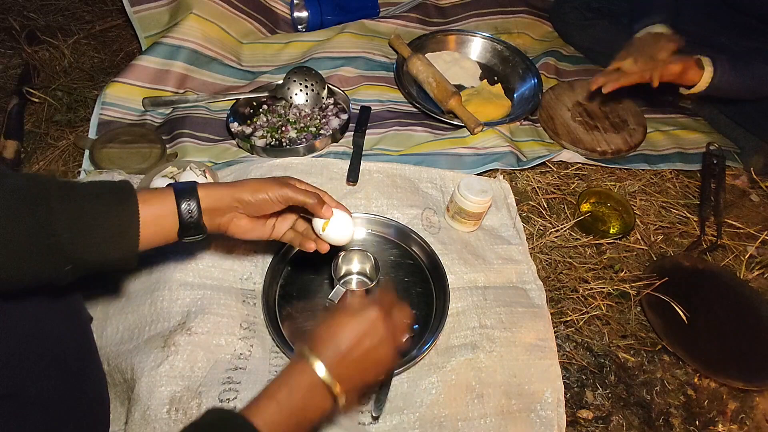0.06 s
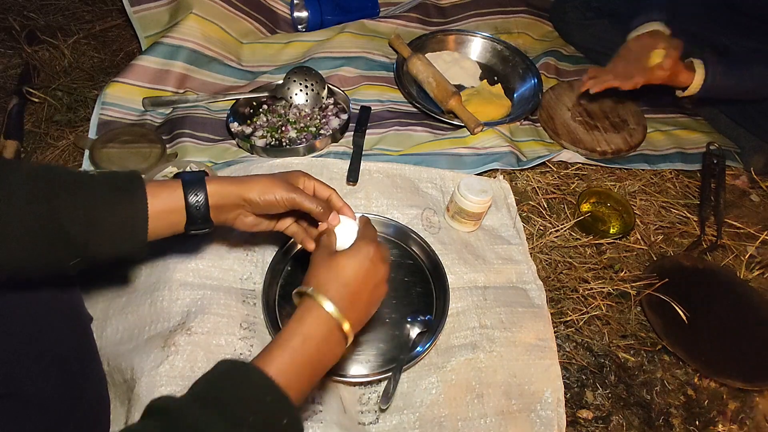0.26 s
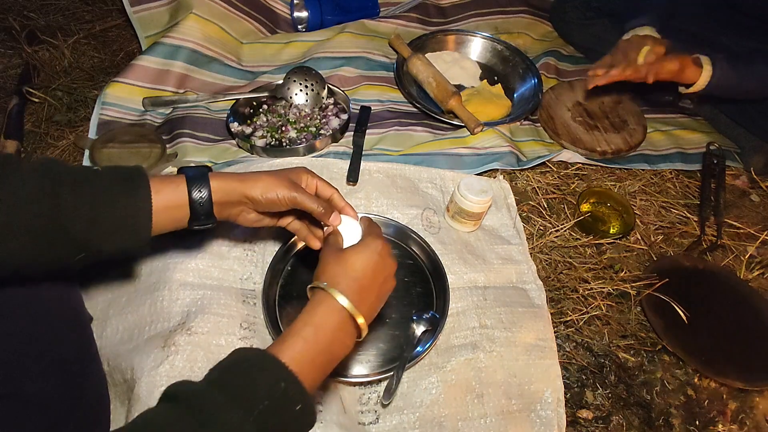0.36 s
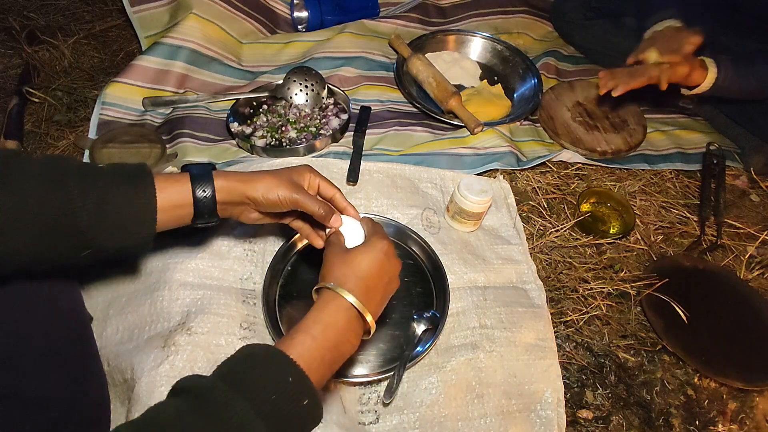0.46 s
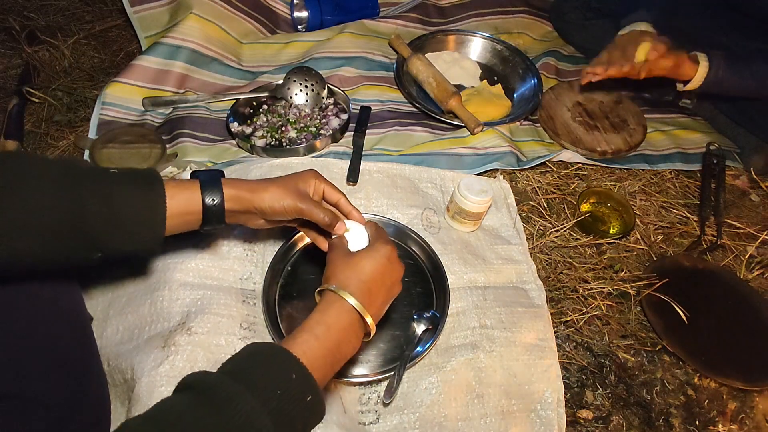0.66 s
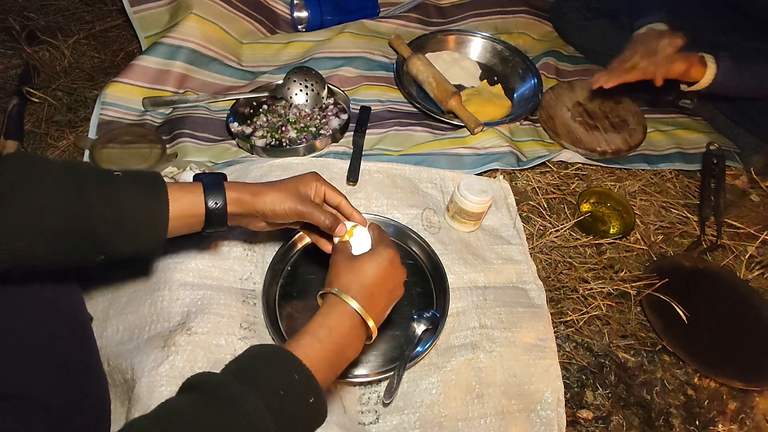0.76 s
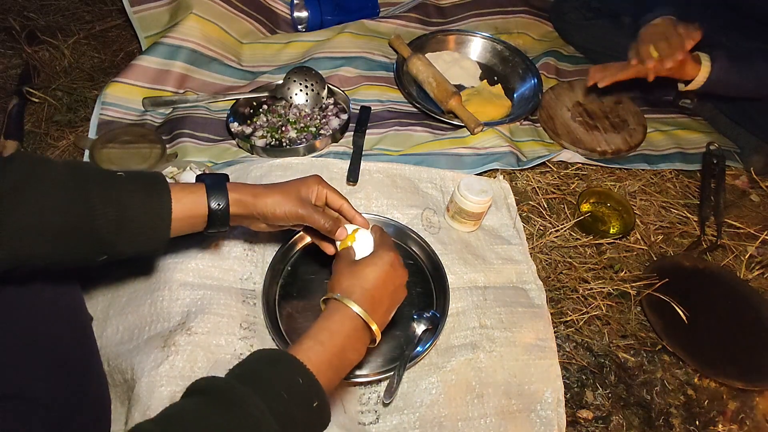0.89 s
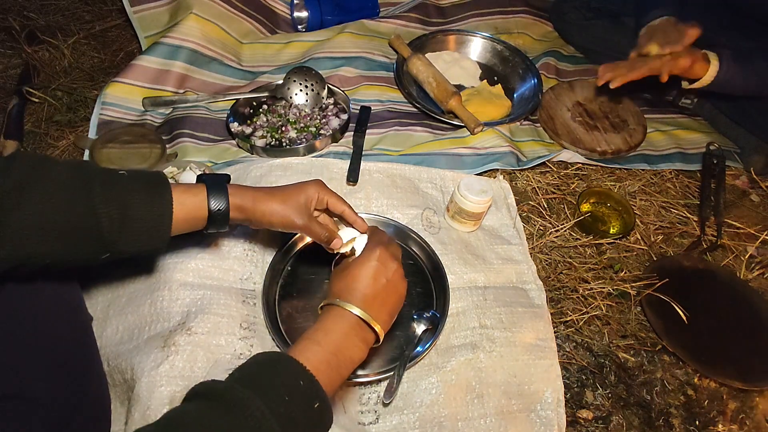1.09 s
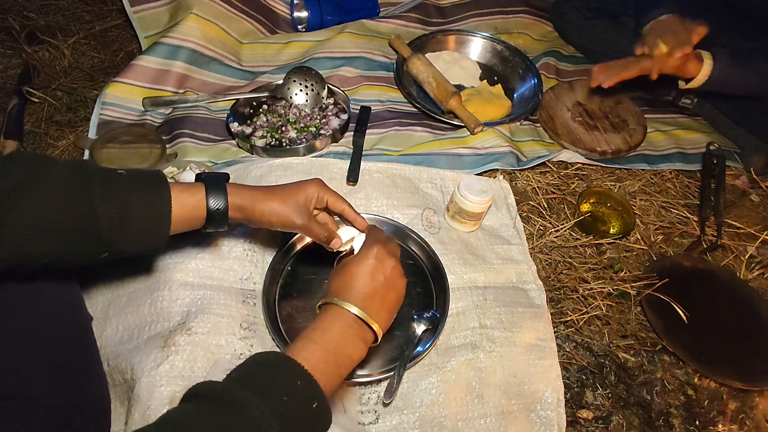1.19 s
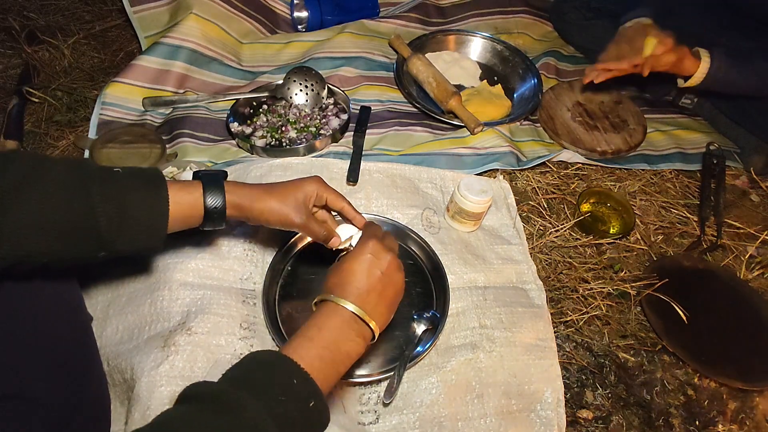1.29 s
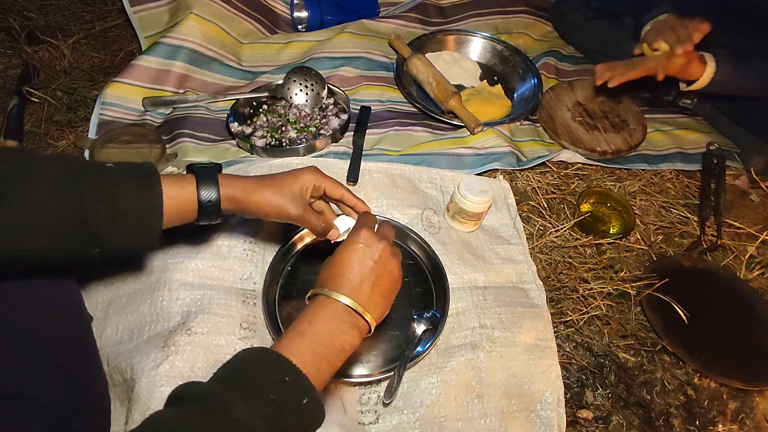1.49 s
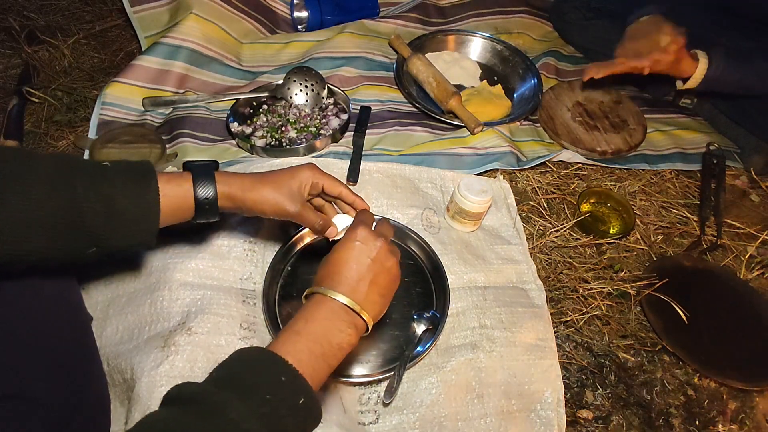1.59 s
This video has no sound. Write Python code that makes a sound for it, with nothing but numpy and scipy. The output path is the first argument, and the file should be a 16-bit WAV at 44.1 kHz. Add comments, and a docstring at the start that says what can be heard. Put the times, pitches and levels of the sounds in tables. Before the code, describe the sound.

Hard-boiled egg shell being cracked and peeled over a steel plate, with knocks, scrapes and small ticks

```python
"""Outdoors, close to a phone, over a faint hiss and whine that lie under it all: something hard knocks and
scrapes a steel plate in four bursts, as low plate modes and dull thuds under gritty noise and thin ringing clinks.
Then fingers rub the egg shell, as soft strokes of resonant noise and hiss, while a few flakes tick off,
each a crack with short rings. Near the end one piece snaps: a hollow tone with noise that swells and dies fast."""
import sys
import numpy as np
from scipy import signal
from scipy.fft import rfft, irfft
from scipy.io import wavfile
from scipy.ndimage import uniform_filter1d

SR = 44100
rng = np.random.default_rng(int(sys.argv[2]) if len(sys.argv) > 2 else 0)


def digitize_waveform(pressure):
    """Quantize a signal to 16-bit integers and store it at the path in sys.argv[1].

    Rows of a 2-D input are taken as channels; values are limited to [-1, 1].
    """
    field = np.atleast_2d(pressure).T
    bounded = np.clip(field, -1, 1)
    quanta = np.round(bounded * 32767).astype(np.int16)
    wavfile.write(sys.argv[1], SR, quanta)


N = 72765
T = np.arange(N) / SR
LIGHT_FROM_S = 0.3  # from here on the scrape is light

# Contact on the plate, relative levels: (time [s], push on the body below 600 Hz [dB], 600-900 Hz [dB],
# above 900 Hz [dB], grit in the middle [dB], grit in the treble [dB])
CONTACT = [(0.02, -61, -73.5, -74, -77.5, -87), (0.034, -39.5, -37, -55, -70.5, -66),
           (0.044, -24, -20.5, -39, -67.5, -68.5), (0.05, -25.5, -13, -14, -39.5, -38.5),
           (0.056, -18.5, -19.5, -23, -29.5, -35.5), (0.084, -20, -28, -25.5, -29.5, -32.5),
           (0.124, -40.5, -52.5, -46.5, -44.5, -55.5), (0.154, -55.5, -54, -42, -48.5, -49.5),
           (0.168, -24, -33, -35, -56, -57.5), (0.178, -17.5, -31.5, -30, -29, -21.5),
           (0.188, -18.5, -30.5, -33, -20.5, -27), (0.2, -18.5, -25, -33, -31.5, -23.5),
           (0.214, -17, -26.5, -16, -20.5, -27), (0.23, -13.5, -25.5, -22.5, -27, -29.5),
           (0.258, -20.5, -22.5, -19, -29, -27), (0.27, -27.5, -26.5, -32, -27.5, -28.5),
           (0.29, -18, -25.5, -23, -25.5, -27), (0.316, -29.5, -33.5, -29, -37, -31),
           (0.33, -27, -43.5, -35.5, -30.5, -39), (0.378, -61, -52, -49.5, -58, -53.5),
           (0.394, -40, -48, -51, -41, -53), (0.418, -33, -32.5, -44, -40.5, -44),
           (0.506, -34.5, -43.5, -38.5, -42.5, -44), (0.536, -43, -51.5, -44.5, -52, -54.5),
           (0.564, -57.5, -56, -43.5, -53.5, -54), (0.582, -35.5, -35.5, -29.5, -49, -37.5),
           (0.602, -34, -40.5, -30.5, -33, -37.5), (0.634, -35, -54, -39, -44, -37),
           (0.72, -105, -86, -87, -74, -97)]


def undb(db):
    """Decibels to amplitude factor."""
    return 10 ** (np.asarray(db) / 20)


def unit(x):
    """Scale to an RMS of one."""
    return x / np.sqrt(np.mean(x ** 2))


def curve(table, axis):
    """Amplitude over time, drawn in dB between the rows of one table column; silent outside them."""
    table = np.array(table)
    return undb(np.interp(T, table[:, 0], table[:, axis], left=-120, right=-120))


def band(x, lo_hz, hi_hz):
    """Gentle band-pass."""
    return signal.sosfilt(signal.butter(2, [lo_hz, hi_hz], "band", fs=SR, output="sos"), x)


def above(x, hz):
    """The part of x above hz; x minus it is the part below."""
    return signal.sosfiltfilt(signal.butter(2, hz, "high", fs=SR, output="sos"), x)


def colour(x, points):
    """Shape the spectrum by (frequency [Hz], level [dB]) points."""
    p = np.array(points)
    hz = np.arange(N // 2 + 1) * SR / N + 1  # the 1 avoids log(0)
    gain_db = np.interp(np.log(hz), np.log(p[:, 0]), p[:, 1])
    return irfft(rfft(x) * undb(gain_db), N)


def ring(x, modes):
    """Sum of resonances (frequency [Hz], width [Hz], level [dB]), with alternate signs."""
    out = 0
    for k, (hz, width_hz, db) in enumerate(modes):
        b, a = signal.iirpeak(hz, hz / max(width_hz, 5), SR)
        out = out + (-1) ** k * undb(db) * signal.lfilter(b, a, x)
    return out


def grains(rough_db):
    """Dense noise with scattered larger grains."""
    lift = uniform_filter1d(rng.exponential(size=N), size=4)
    return unit(rng.standard_normal(N) * undb(rough_db * lift))


def spikes(events):
    """Single-sample impulses at (time [s], level [dB])."""
    x = np.zeros(N)
    for s, db in events:
        x[int(s * SR)] += undb(db)
    return x


def swell(s, rise_s, t60_s):
    """Exponential rise to s, then decay."""
    return np.exp(np.minimum((T - s) / rise_s, -np.log(1000) * (T - s) / t60_s))


def bump(s, half_s):
    """Smooth swell and fade around s."""
    return np.exp(-((T - s) / half_s) ** 2)


def air():
    """Faint steady hiss of coloured noise with a thin whine of steady sines."""
    # Colour of the hiss: (frequency [Hz], relative level per hertz [dB])
    hiss_colour = [(30, -21), (100, -6), (200, 3), (500, -3.5), (800, -4.5), (1100, -9.5), (2000, -10),
                   (4000, -18), (6500, -22), (9000, -21.5), (16000, -24)]
    # Whine: (frequency [Hz], RMS level [dB])
    whine_tones = [(800, -75.5), (1600, -83), (2400, -86.5)]
    hiss = unit(colour(rng.standard_normal(N), hiss_colour)) * undb(-67)
    whine = sum(undb(db) * np.sqrt(2) * np.sin(2 * np.pi * hz * T) for hz, db in whine_tones)
    return hiss + whine


def fingers():
    """Each stroke of the fingers rustles in the shell's resonances with a hiss above."""
    # Resonances of the shell under the fingers: (frequency [Hz], width [Hz])
    shell_resonances = [(1100, 270), (1850, 223), (3550, 740), (5400, 490)]
    # Strokes: (middle [s], half length [s], level in each of four shell resonances [dB] x 4,
    # hiss level [dB], hiss centre [Hz])
    strokes = [(0.809, 0.034, -83.5, -85, -60, -67.5, -72, 6420),
               (0.869, 0.033, -85, -86, -83, -75, -70, 9000),
               (0.967, 0.043, -62.5, -65.5, -58.5, -59, -57.5, 8800),
               (1.131, 0.032, -85, -72, -74, -69.5, -88, 9000),
               (1.181, 0.029, -79, -83, -83, -84, -61.5, 10500),
               (1.26, 0.032, -81, -82, -85, -87, -61.5, 9700),
               (1.498, 0.031, -78.5, -82, -81.5, -75.5, -60.5, 10600),
               (1.6, .03, -84.5, -91, -85, -88, -67, 8800)]
    rustles = [unit(band(grains(2.2), hz - w / 2, hz + w / 2)) for hz, w in shell_resonances]
    out = 0
    for s, half_s, *rustle_db, hiss_db, hiss_hz in strokes:
        hiss = unit(band(grains(2.2), hiss_hz * 0.69, hiss_hz * 1.26))
        rustle = sum(undb(db) * x for db, x in zip(rustle_db, rustles))
        out = out + bump(s, half_s) * (rustle + undb(hiss_db) * hiss)
    return out


def flakes():
    """Each flake ticks off with a sharp crack, three short rings and a little crumble after it."""
    # Ticks: (time [s], ring t60 [s], then three rings as frequency [Hz] and level [dB],
    # crack peak level [dB], crack top [Hz], relative crumble level [dB])
    ticks = [(.959, 0.017, 3710, -43, 5400, -53, 8900, -45, -35, 12000, -71),
             (1.134, 0.04, 2488, -37, 1600, -41, 3710, -48.5, -48, 4970, -55.5),
             (1.208, .03, 2430, -56.5, 1600, -66, 3700, -70, -66, 4000, -85),
             (1.265, 0.015, 1113, -31.5, 2300, -30, 3450, -49, -32, 3500, -49.5)]
    out = 0
    for s, t60, *modes, crack_db, top_hz, crumble_db in ticks:
        rings = 0
        for hz, db in zip(modes[::2], modes[1::2]):
            ring_t60 = t60 * min(1, (modes[0] / hz) ** 2)  # rings above the first die sooner
            fade = swell(s + t60 / 20, t60 / 40, ring_t60)
            rings = rings + undb(db) * np.sin(2 * np.pi * hz * (T - s)) * fade
        crack = band(spikes([(s, 0), (s + 0.00063, -7)]), top_hz / 4, top_hz)
        crack = band(crack, top_hz / 8, top_hz * 1.64)
        crumble = unit(band(grains(2.78), 600, 3000)) * swell(s + 0.018, 0.015, 0.094)
        out = out + rings + undb(crack_db) * crack / crack.max() + undb(crumble_db) * crumble
    return out


def snap():
    """A larger piece breaks away: faint crumbs, a hiss, a hollow swelling tone, then the plate answers late."""
    # Rings of the piece: (frequency [Hz], width [Hz], relative level [dB])
    piece_rings = [(2848, 44, -6.5), (3030, 34, -3), (3285, 48, -7.5), (3560, 23, -14), (4430, 29, -28)]
    # Colour of the hiss: (frequency [Hz], relative level per hertz [dB])
    hiss_colour = [(1200, -41.5), (2000, -2.5), (2500, 5), (4000, -7), (5900, 2.5), (7300, -9),
                   (9500, -2.5), (16000, -16)]
    # Late answer of the plate: (frequency [Hz], width [Hz], relative level [dB])
    late_modes = [(395, 34, -2), (556, 45, -2.5), (1170, 81, -8)]
    snap_s, rise_s, t60_s = 1.381, 0.007, 0.022
    crumbs_s, crumbs_half_s, low_crumbs_hz = 1.3, 0.033, 2580

    shape = np.where(T < snap_s, bump(snap_s, rise_s), swell(snap_s, rise_s, t60_s))
    noisy = unit(ring(grains(1.9), piece_rings))
    tone = shape * (np.sin(2 * np.pi * piece_rings[0][0] * T) + 0.29 * noisy)
    after_ring = undb(-16.5) * swell(snap_s + 0.012, 0.0043, 0.08) * noisy

    # two overlapping puffs of crumbs, the second lower
    crumbs = unit(band(grains(1.36), 2700, 3350)) * bump(crumbs_s - 0.008, crumbs_half_s)
    low_crumbs = unit(band(grains(2.6), low_crumbs_hz * 0.83, low_crumbs_hz * 1.22))
    crumbs = crumbs + 0.84 * low_crumbs * bump(crumbs_s + 0.0098, crumbs_half_s)

    hiss = unit(colour(grains(2.0), hiss_colour)) * swell(1.369, 0.00096, t60_s=0.13)
    late = unit(band(ring(grains(2.4), late_modes), 290, 1200)) * swell(1.395, 0.015, t60_s=0.14)
    piece = undb(-13.5) * (tone + undb(-31.5) * crumbs + after_ring)
    return piece + undb(-33.5) * hiss + undb(-42) * late


def body(drive, axis):
    """The plate's low modes as resonators; drive holds one push for each of three frequency ranges."""
    # Low modes: (frequency [Hz], width [Hz], relative level when knocked or firmly pushed [dB],
    # relative level when lightly scraped [dB])
    low_modes = [(295, 40, -16, -14), (366.8, 67, 1.5, -7), (440.6, 19, 3, 2), (552.5, 48, -4.5, -12),
                 (666.5, 86, -3, -10), (743, 28, -2, 0.5), (1062, 91, -6.5, -12.5), (1151, 45, -4, -10.5),
                 (1222, 22, -7.5, 1.5), (1280, 24, -8, -6.5), (1350, 13, -14, -9)]
    # Borders of the three ranges: (frequency [Hz])
    range_borders = [600, 900]
    out = 0
    for k, mode in enumerate(low_modes):
        hz, width_hz = mode[:2]
        part = drive[np.searchsorted(range_borders, hz)]
        out = out + (-1) ** k * ring(part, [(hz, width_hz, mode[axis])])
    return out


def knocks():
    """Each blow is a dull tap and the ring of the body, returned apart from a faint thud through the ground."""
    # Dull knocks: (time [s], relative level [dB], pitch of the tap [Hz], thud level relative to the knock [dB])
    blow_list = [(.04, -36.5, 789, -20), (0.0519, -7, 729.6, -9), (0.0577, -13.5, 530.8, 0.5),
                 (.074, -7.5, 600, -0.5), (.083, -14, 1050, 1), (0.1777, -10, 516.7, 4),
                 (.183, -11.5, 420, -3), (.194, -8.5, 413.5, 5.5), (.212, -11.5, 939, -12),
                 (.217, -12.5, 400, -5), (.2365, -7, 620, -9), (.271, -9.5, 700, -12.5),
                 (0.2876, -9, 572.2, -36)]
    pulse = np.hanning(int(0.0008 * SR))
    blows = np.convolve(spikes([row[:2] for row in blow_list]), pulse)[:N]
    rung = body([blows] * 3, axis=2)
    rung = rung * blows.max() / abs(rung).max()
    tap = 0
    for s, db, hz, _ in blow_list:
        wave = np.cos(2 * np.pi * hz * (T - s - 0.001))
        tap = tap + undb(db) * wave * bump(s + 0.0011, 1.1 / hz)  # half length of 1.1 cycles
    thud_spikes = spikes([(s, db + thud_db) for s, db, _, thud_db in blow_list])
    thud = band(np.convolve(thud_spikes, pulse)[:N], 25, 150)
    return undb(-4.5) * rung + undb(-2) * tap, undb(-23) * thud


def push():
    """Uneven pressure keeps the body sounding; a light scrape changes the balance of its modes."""
    # Landings, the push being held back just before each: (time [s])
    landings = [.0505, .1765]
    hush_s, hush_db = 0.03, -26.5
    noise = grains(7.2)
    light = T > LIGHT_FROM_S
    hushed = sum((T > s - hush_s) & (T < s) for s in landings)
    pressure = noise * undb(hush_db * hushed)
    out = 0
    for axis, when in ((2, ~light), (3, light)):
        drive = []
        for part in range(3):
            # level each range by its own response to steady noise
            solo = np.std(body(np.eye(3)[part][:, None] * noise, axis))
            drive.append(pressure * when * curve(CONTACT, axis=part + 1) / solo)
        out = out + body(drive, axis)
    return out * undb(-2)


def grit():
    """Coarse noise follows the contact as a lumpy rattle and wakes broad resonances in the rim."""
    # Colour of the grit: (frequency [Hz], relative level per hertz [dB])
    grit_colour = [(760, -42), (1300, -13), (1670, -16), (2550, -11.5), (3170, -4), (3490, -13.5),
                   (6150, -12), (10700, -19.5), (11400, -25), (13800, -19), (16000, -37.5)]
    # Broad resonances of the rim: (frequency [Hz], width [Hz], relative level [dB])
    rim_resonances = [(2276, 110, -6.5), (2910, 31, -13.5), (3180, 92, 0.5), (3400, 88, -10),
                      (6080, 150, -14), (7000, 170, -10.5)]
    rough_db, lumps_db, light_top_db = 4, 2.16, -1

    span = int(0.0084 * SR)  # lumps of about 8 ms
    wander = uniform_filter1d(uniform_filter1d(rng.standard_normal(N), span), span)
    lumps = unit(undb(lumps_db * unit(wander)))

    coloured = colour(grains(rough_db), grit_colour)
    treble = above(coloured, 3800)
    middle = above(coloured, 1400) - treble
    # a light scrape is duller above 15 kHz
    treble = treble + above(coloured, 15000) * (undb(light_top_db * (T > LIGHT_FROM_S)) - 1)
    rattle = unit(middle) * curve(CONTACT, axis=4) + unit(treble) * curve(CONTACT, axis=5)

    noise = grains(rough_db)
    rim = ring(noise * curve(CONTACT, axis=4), rim_resonances) / np.std(ring(noise, rim_resonances))
    return rattle * lumps + undb(-8.5) * rim


def clinks():
    """Short strikes on the rim leave thin fading rings; a later strike chokes what still rings."""
    # Strikes: (time [s], relative level of each of five groups of modes [dB] x 5)
    strikes = [(.179, -12.5, -27.5, -26, -30, -28), (0.188, -20, -21, -31, -34.5, -24.5),
               (0.208, -22, -37.5, -22, -26, -42), (0.261, -18, -40.5, -17.5, -38, -34),
               (.58, -30, -59, -52, -70, -70)]
    # Rim mode pitches: (frequency [Hz])
    rim_pitches = [3063, 3175, 3480, 3752, 4210, 5292, 5960, 6340, 6720, 10355, 10712, 12100, 13665, 14800]
    # Each rim mode in the same order: (relative level [dB], t60 [s])
    rim_modes = [(-9.5, 0.05), (2.5, .09), (-18, 0.16), (-14.5, 0.064), (-7.5, 0.013), (-2, .15),
                 (-0.5, 0.052), (-5.5, 0.11), (-2.5, .06), (-7, 0.13), (0, 0.21), (-1.5, 0.086), (0, 0.22),
                 (-7.5, .08)]
    # Borders of the five groups: (frequency [Hz])
    group_borders = [4500, 5600, 8000, 11000]
    choke_t60_s = 0.036
    out = 0
    for s, *group_db in strikes:
        later = min([row[0] for row in strikes if row[0] > s + 0.015] + [T[-1]])
        choke = np.exp(-np.log(1000) * np.maximum(T - later, 0) / choke_t60_s)
        phases = rng.random(len(rim_modes))  # in cycles
        for hz, (db, t60), phase in zip(rim_pitches, rim_modes, phases):
            level = undb(db + group_db[np.searchsorted(group_borders, hz)])
            tone = np.sin(2 * np.pi * (hz * T + phase))
            out = out + level * tone * swell(s, 0.0012, t60) * choke
    return out


def plate():
    """Knocks and push sound the low body; grit rattles broadly and wakes the rim, which also clinks."""
    blows, thud = knocks()
    low_cut = signal.butter(4, 265, "high", fs=SR, output="sos")
    low = signal.sosfiltfilt(low_cut, blows + push())
    return low + thud + grit() + clinks()


def scene():
    """Centred, with a slight stereo width in the treble from a short decaying noise filter."""
    mid = plate() + fingers() + flakes() + snap() + air()
    fade = np.exp(-np.arange(1000) / (0.006 * SR))  # 6 ms time constant
    noise_filter = rng.standard_normal(1000) * fade
    side = np.convolve(mid, noise_filter / np.linalg.norm(noise_filter))[:N]
    treble_only = signal.butter(10, 6300, "high", fs=SR, output="sos")
    side = signal.sosfilt(treble_only, side) * undb(-10.5)
    return np.array([mid + side, mid - side])


def record(dry):
    """The phone cuts the top steeply above 15.8 kHz."""
    return signal.sosfilt(signal.ellip(10, 0.2, 80, 15800, fs=SR, output="sos"), dry)


dry = scene()
out = record(dry)
digitize_waveform(out)
```